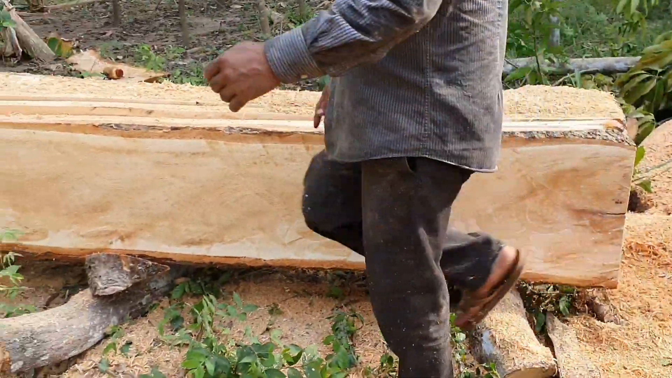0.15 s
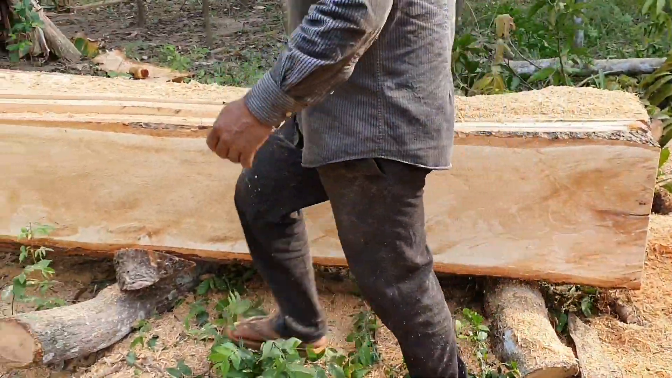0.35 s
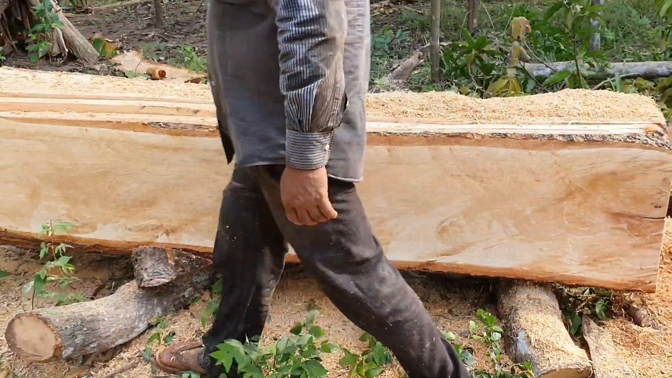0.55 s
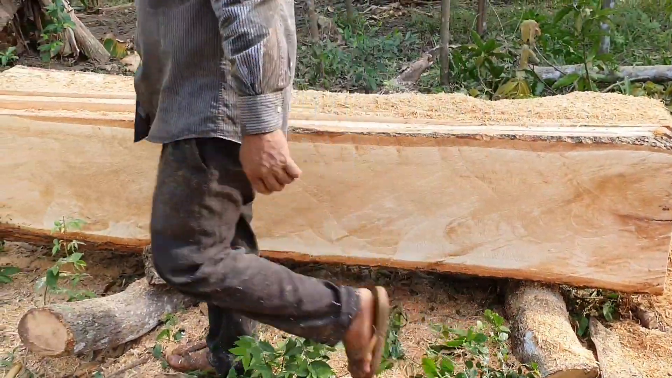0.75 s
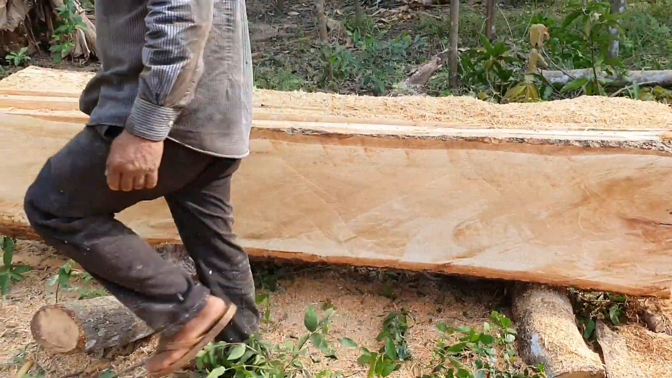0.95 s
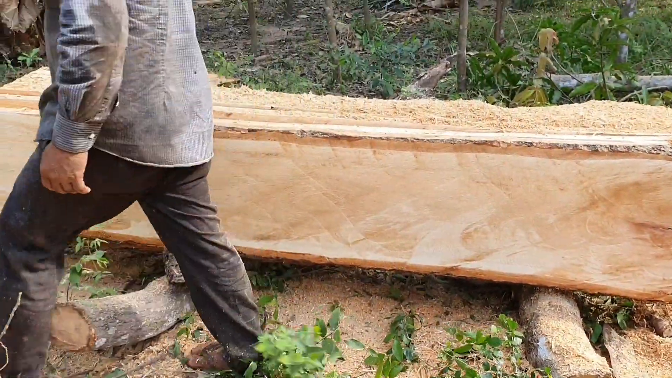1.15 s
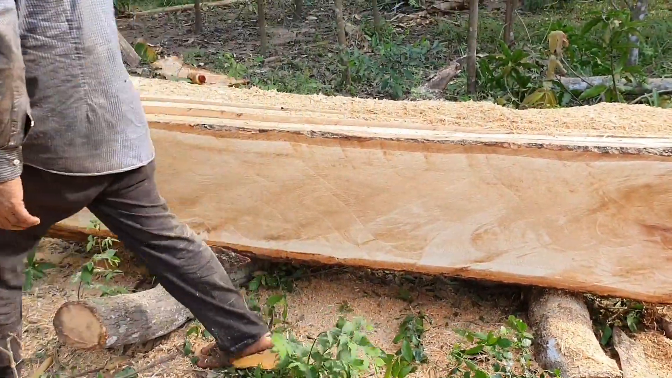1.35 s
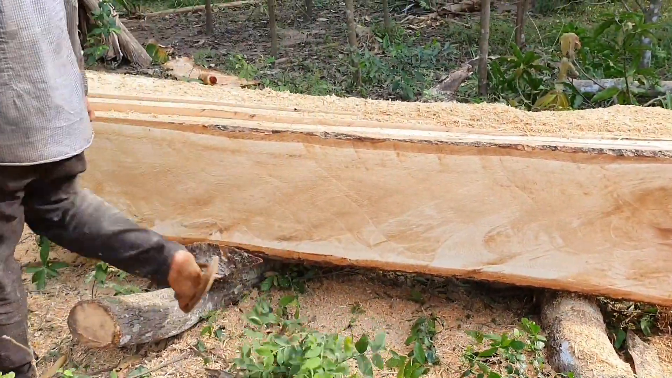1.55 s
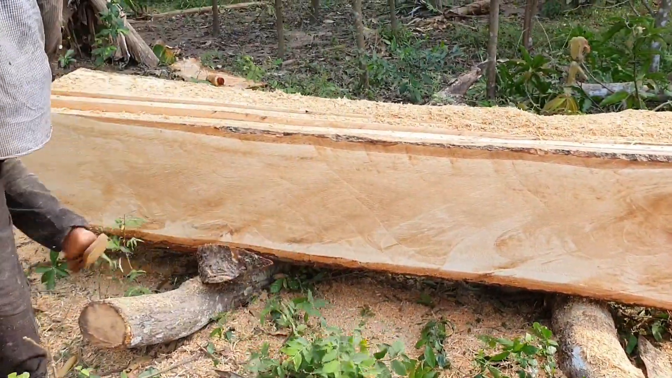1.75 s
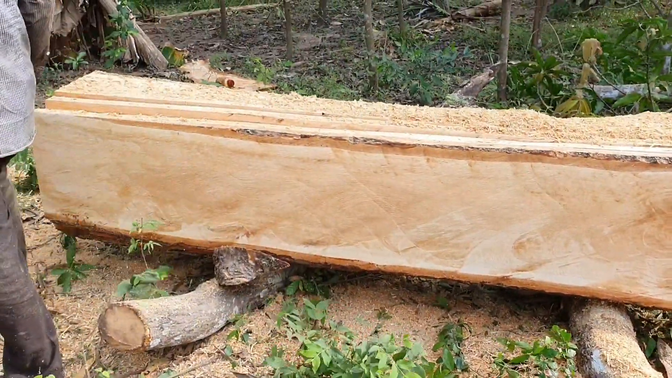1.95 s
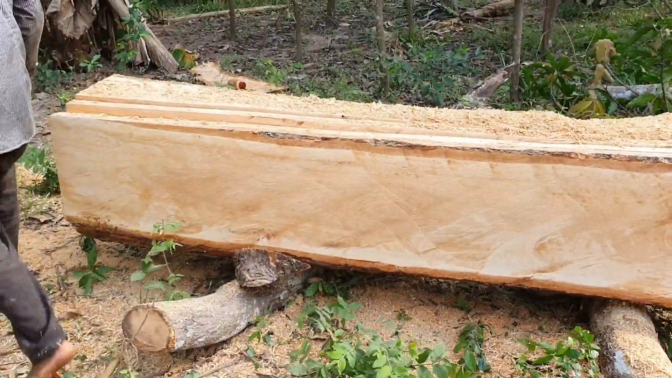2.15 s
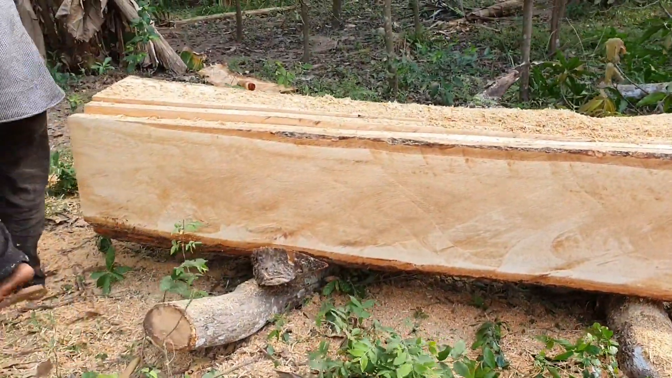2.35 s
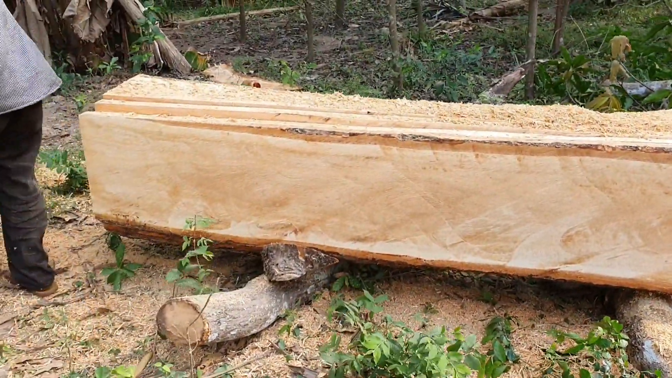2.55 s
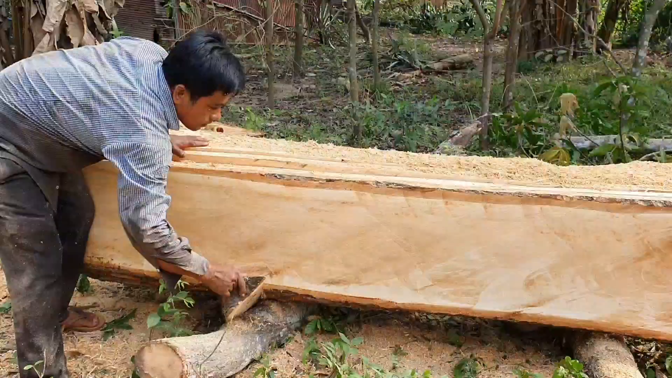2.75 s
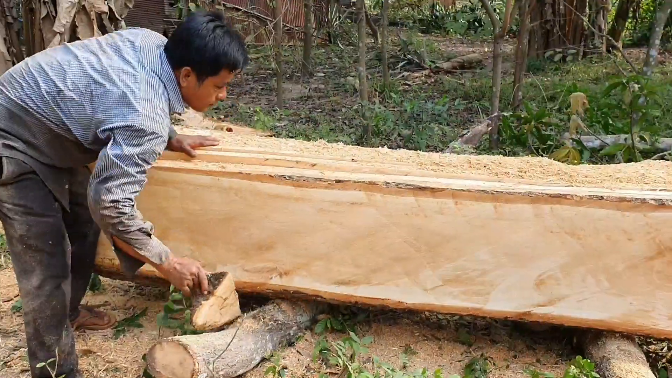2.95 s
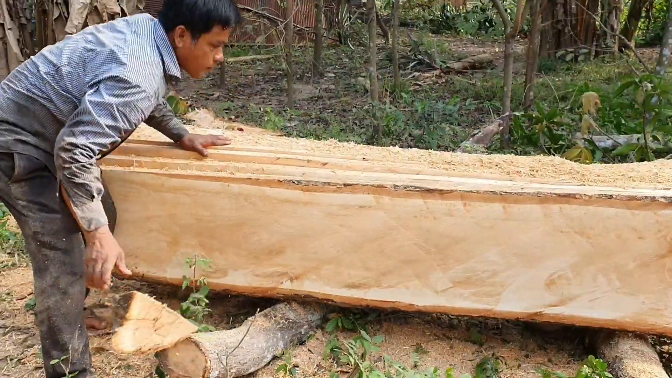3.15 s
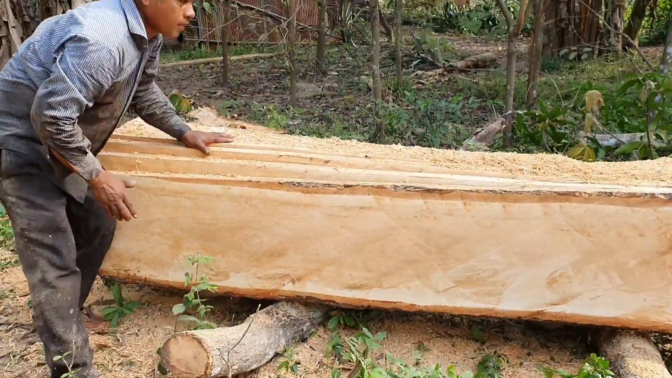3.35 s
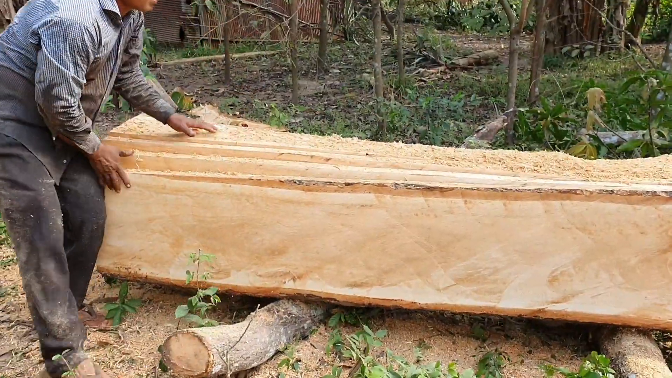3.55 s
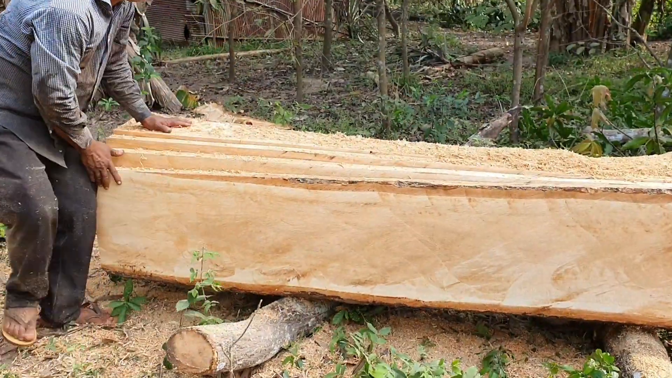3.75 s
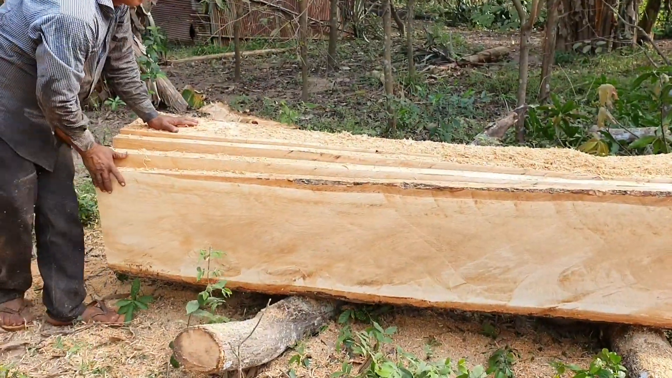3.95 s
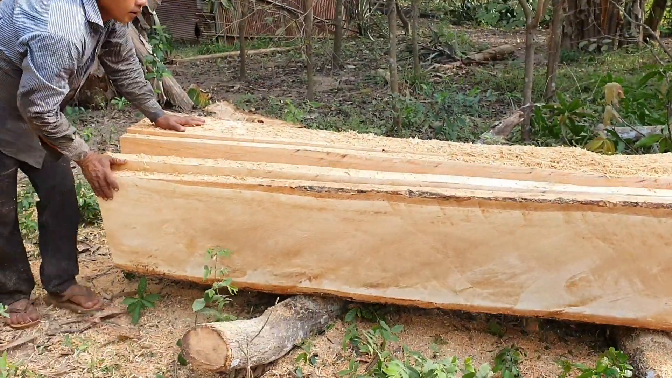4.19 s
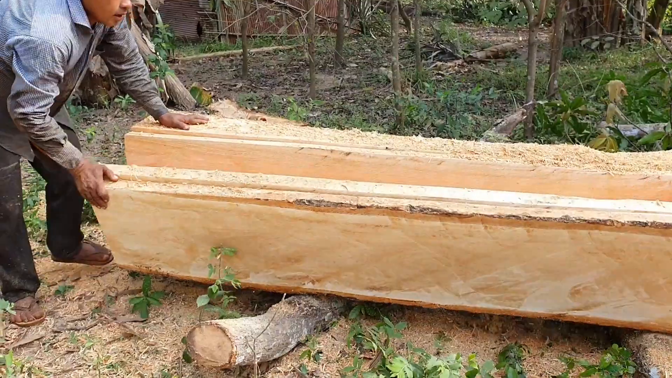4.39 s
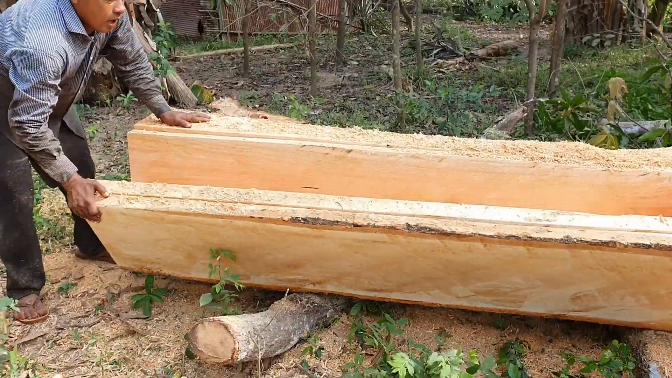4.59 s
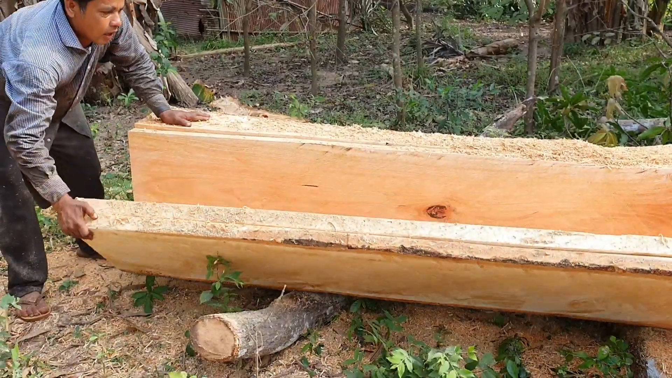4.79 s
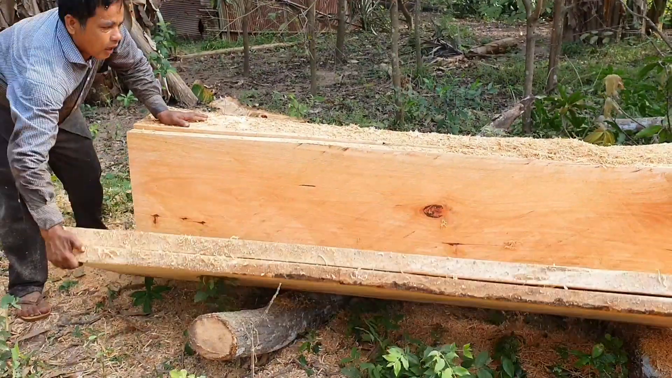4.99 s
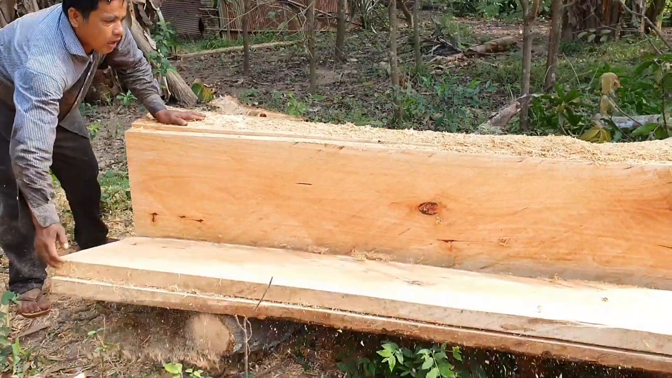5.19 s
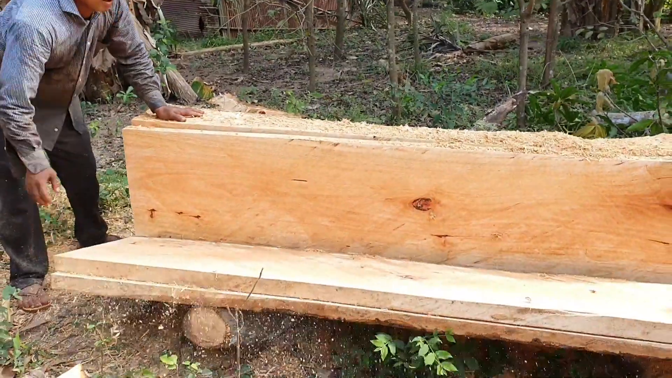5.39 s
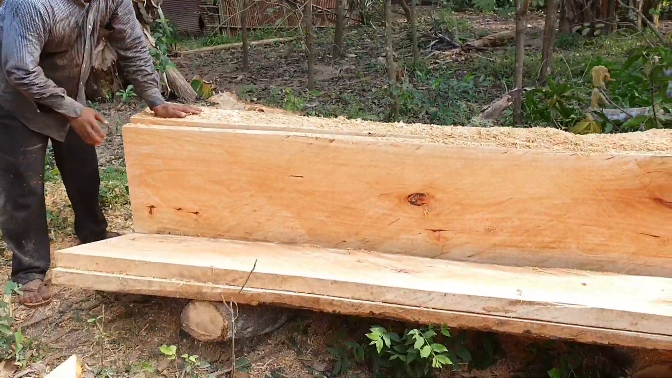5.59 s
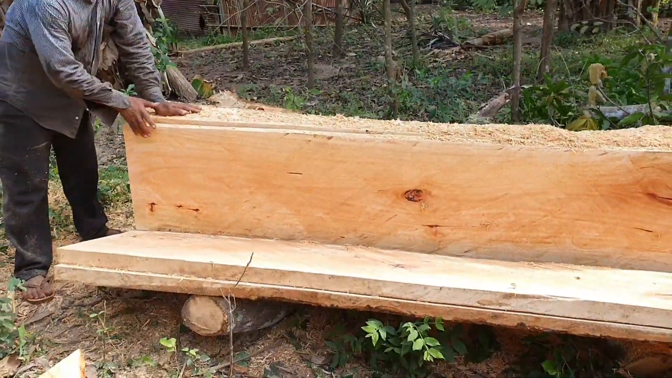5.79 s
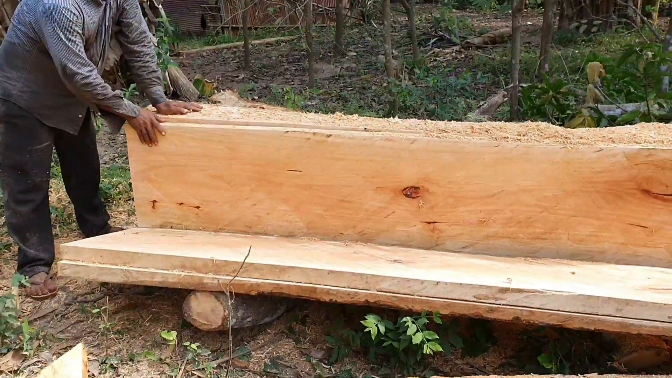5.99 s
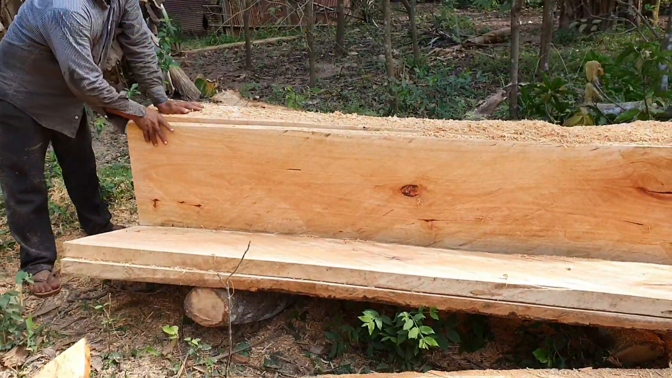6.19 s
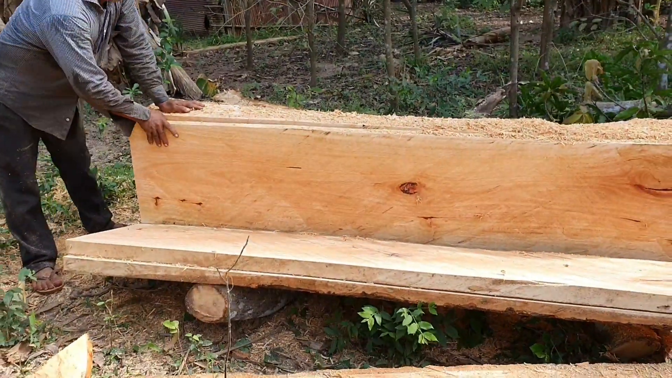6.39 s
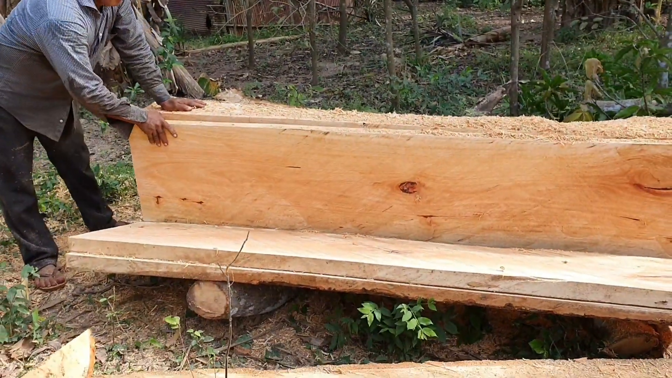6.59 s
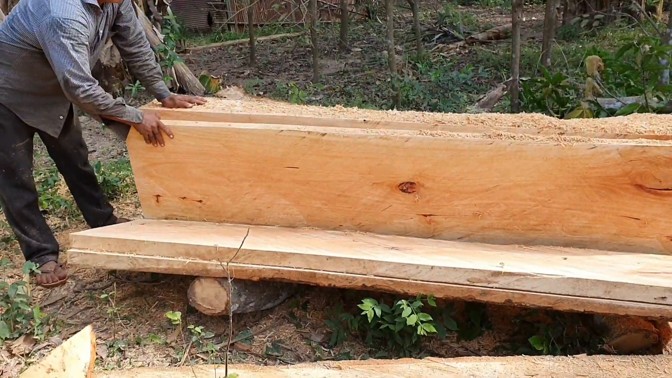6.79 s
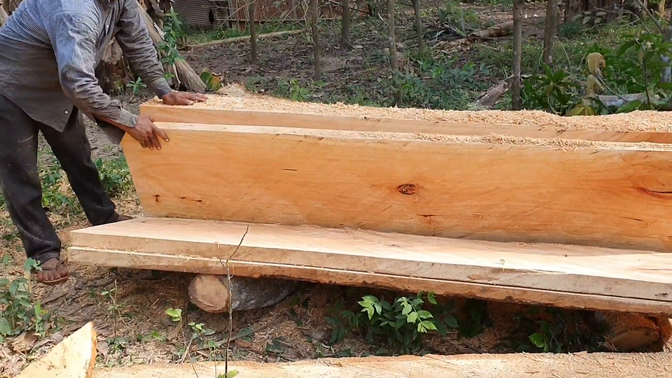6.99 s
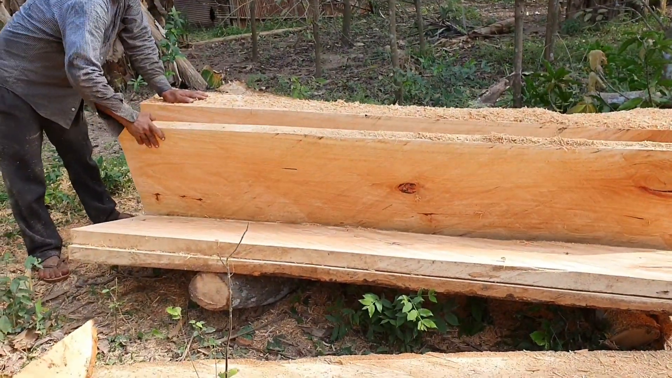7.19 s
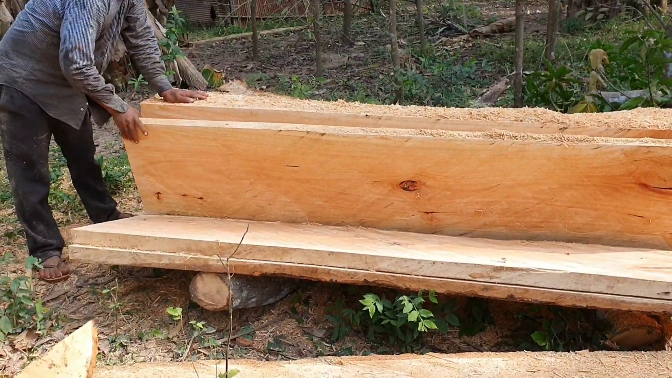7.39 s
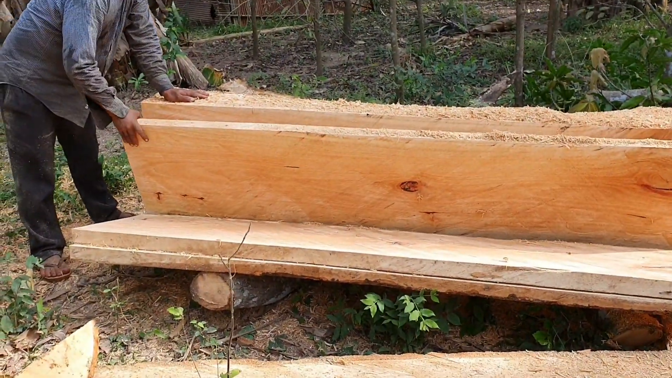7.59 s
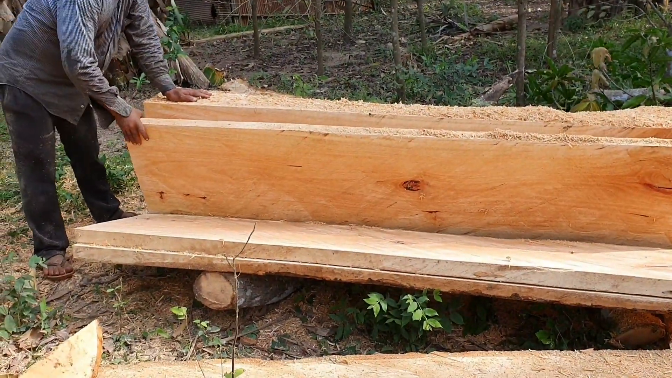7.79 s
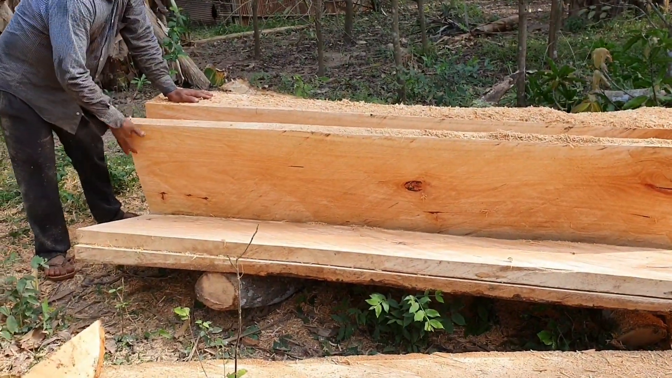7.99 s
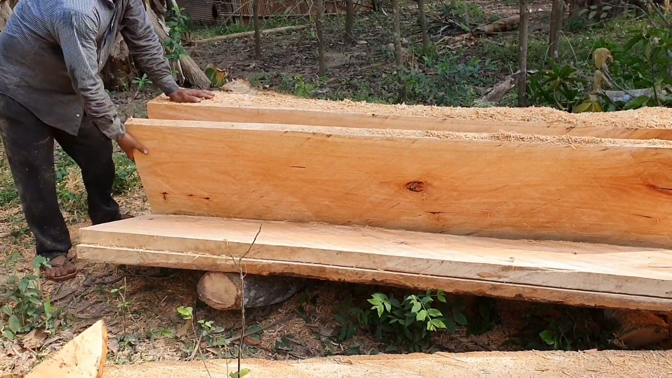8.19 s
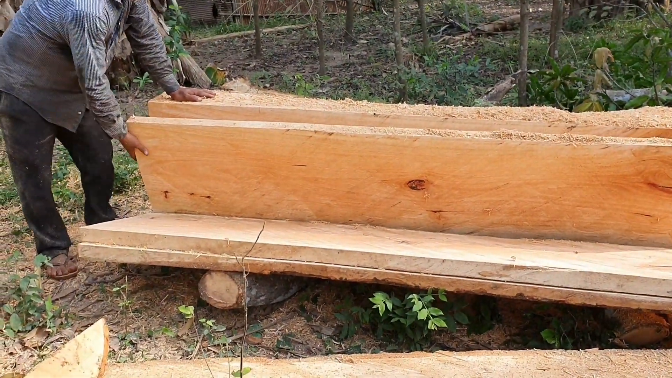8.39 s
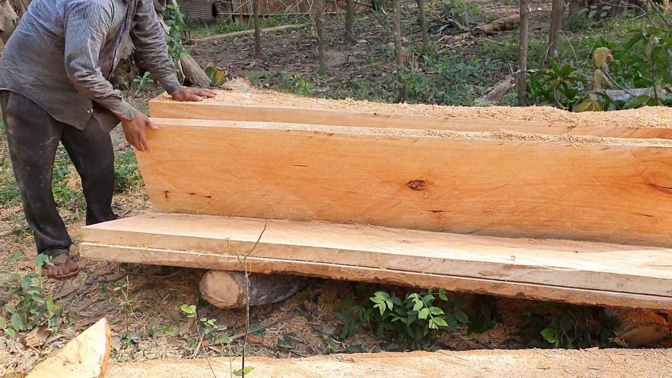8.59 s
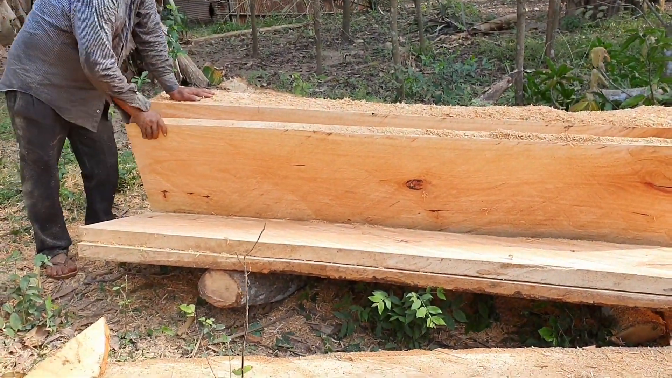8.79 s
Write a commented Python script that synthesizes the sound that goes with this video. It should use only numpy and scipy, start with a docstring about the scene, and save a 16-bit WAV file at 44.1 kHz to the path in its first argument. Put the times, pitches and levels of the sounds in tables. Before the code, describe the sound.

Footsteps snap twigs, a tossed wedge clacks, and thick boards tip with one loud woody slam; chicks, sparrows and a distant cock call.

```python
"""Tipping thick boards outdoors

Thick fresh boards are tipped over: a wedge is tossed aside, two boards slam onto a log, bounce and rattle.
Struck wood is resonant modes driven by short rough pushes; twigs are damped bursts, creaks gliding tones.
Leaf litter, sleeves and scrapes are swelling noise; chicks, sparrows, hens and a far cock are gliding tones.
Trees hiss and insects sing as steady noise. The left port is weaker than the right and leads it in phase."""
import sys
import numpy as np
from scipy import signal
from scipy.fft import rfft, irfft, next_fast_len
from scipy.io import wavfile
from scipy.ndimage import uniform_filter1d

SR = 44100
rng = np.random.default_rng(int(sys.argv[2]) if len(sys.argv) > 2 else 0)


def wav_out(sig):
    """Save sig, one row per channel (or a flat mono array), as 16-bit PCM at SR to the path in sys.argv[1]."""
    wavfile.write(sys.argv[1], SR, np.round(np.clip(np.atleast_2d(sig).T, -1, 1) * 32767).astype(np.int16))


N = 389844

# resonances of a lying board: f/Hz, bandwidth/Hz, level/dB
BOARD_MODES = [(172, 45, -9), (251.4, 36, 1), (351, 46, -9), (385, 26, -9.5), (491, 60, -9), (618, 78, -7),
               (665.4, 13, -6.5), (807, 70, -1), (941, 21, -6.5), (1025, 78, -8.5), (1205, 45, -7),
               (1446, 68, -6), (1790, 90, -5), (2060, 60, -6), (2240, 48, -5), (2680, 80, 1)]
# resonances of the edge on which the boards tip: f/Hz, bandwidth/Hz, level/dB
EDGE_MODES = [(1120, 70, 0), (1540, 90, -6), (1830, 90, -7), (2200, 120, -9), (2600, 110, -4),
              (3250, 140, -5)]


def amp(db):
    """Amplitude ratio of a level: 20 dB is a factor of ten."""
    return 10 ** (np.asarray(db) / 20)


def unit(x):
    """Normalisation to an rms value of 1."""
    return x / np.sqrt(np.mean(x ** 2) + 1e-20)


def peaked(x):
    """Normalisation to a peak value of 1."""
    return x / np.max(np.abs(x))


def along(points, hz):
    """Interpolation of (f/Hz, value) points on a logarithmic frequency axis."""
    f, v = np.transpose(points)
    return np.interp(np.log(hz + 1), np.log(f + 1), v)


def filtered(x, response):
    """Linear filtering: the spectrum is multiplied by a complex frequency response."""
    m = next_fast_len(N + SR // 2)
    return irfft(rfft(x, m) * response(np.fft.rfftfreq(m, 1 / SR)), m)[..., :N]


def band(hz, lo_hz, hi_hz):
    """Causal band-pass response with two poles at each edge."""
    high_pass = 1j * hz / (lo_hz + 1j * hz)
    low_pass = hi_hz / (hi_hz + 1j * hz)
    return (high_pass * low_pass) ** 2


def wood(modes, hz):
    """Modal superposition: damped resonators of alternating sign add up to the response of a piece of wood."""
    response = 0
    for k, (center_hz, width_hz, db) in enumerate(modes):
        resonance = 1j * hz * width_hz / (center_hz * center_hz - hz * hz + 1j * hz * width_hz)
        response = response + (-1) ** k * amp(db) * resonance
    return response


def smoothed_noise(shape, first, second):
    """Slow random fluctuation of rms 1: white noise averaged over two windows, in samples."""
    return unit(uniform_filter1d(uniform_filter1d(rng.standard_normal(shape), size=first), size=second))


def texture(spectrum, grit_db, patchy_db, flutter_db):
    """Granular noise: two rows with sparse random spikes, coloured, patchy and fluttering in time."""
    sizes = amp(grit_db * np.minimum(rng.exponential(size=N), 4))
    spikes = rng.standard_normal(N) * sizes * (rng.random(N) < .02)
    z = signal.stft(rng.standard_normal((2, N)) + spikes, nperseg=512)[2]
    # patches extend over frequency and time; the flutter moves all frequencies together
    patches = uniform_filter1d(uniform_filter1d(rng.standard_normal(z.shape[1:]), 6, 0), 6, 1)
    flutter = uniform_filter1d(rng.standard_normal(z.shape[2]), size=3)
    gain = amp(patchy_db * unit(patches) + flutter_db * unit(flutter))
    pair = signal.istft(z * gain, nperseg=512)[1][:, :N]
    return unit(filtered(pair, lambda hz: amp(along(spectrum, hz))))


def notes(rows, bend, rough_hz, second_db, hook_hz=0, lean=.8, flicker_db=0):
    """Frequency modulation: gliding tones with a second harmonic, roughened by a fast random warble.

    A small lean puts the loudest moment early; the hook lets the pitch slide up at the onset."""
    hook_s = .004  # time constant of the slide
    out = np.zeros(N + SR)
    for s, length, from_hz, to_hz, db in rows:
        u = np.arange(round(length * SR)) / (length * SR)
        warble, flicker = smoothed_noise((2, len(u)), 150, 100)
        glide_hz = from_hz + (to_hz - from_hz) * u ** bend - hook_hz * np.exp(-u * length / hook_s)
        phase = 2 * np.pi * np.cumsum(glide_hz + rough_hz * warble) / SR
        swell = np.sqrt(np.sin(np.pi * u ** lean)) * amp(flicker_db * flicker)
        tone = np.sin(phase) + amp(second_db) * np.sin(2 * phase)
        out[round(s * SR):][:len(u)] += amp(db + 5) * swell * tone
    return out[:N]


def swells(peak_s, fade_s, db, skirt_db, still_db):
    """Power summation: swells rise and fade evenly in dB, each on a wider skirt, over a still level."""
    rise_share = .7  # the rise takes this share of the fading time
    skirt_slower = 3.5  # the skirt lasts this many times longer
    t = np.arange(0, N, 64) / SR - peak_s[:, None]
    fall_db = 10 * abs(t) / (np.where(t < 0, rise_share, 1) * fade_s[:, None])
    shape = amp(-fall_db) ** 2 + amp(skirt_db - fall_db / skirt_slower) ** 2
    power = amp(db[:, None]) ** 2 * shape
    return np.repeat(np.sqrt(power.sum(0) + amp(still_db) ** 2), 64)[:N]


def boards():
    """Impact excitation: a short push with a rough surface rings the wood's modes and cracks in the treble."""
    # blows on wood: t/s, knock peak level/dB, boom level/dB re knock, crack level/dB re knock
    blows = [(3.091, -47.5, -30, 0), (3.297, -51, -28, 6.5), (3.308, -47, -34, 5.5), (3.3885, -29, -10, 3),
             (3.393, -34, -12, -3), (3.401, -40, -12, -14), (3.41, -52, 11, -9), (3.425, -58, 10, -9),
             (3.441, -43, -9, -4), (3.518, -48, 1, -6), (4.047, -47.5, -32, -2.5), (4.822, -42, -31, -3),
             (4.847, -40, -36, 1), (4.889, -30.5, -28, 0), (4.903, -43, -24, 4.5), (5.049, -42, -40, 5),
             (5.164, -27, -6, -13), (5.167, -19, -8, -18), (5.1705, -10, -14, -22), (5.185, -21, -12, -9),
             (5.189, -17, -7, -13), (5.2, -25, -8, 9.5), (5.218, -29, -2, -6), (5.262, -40, -20, -10),
             (5.2745, -34, -9, -8), (5.278, -19, -7, -28), (5.2815, -23, -5, -28), (5.291, -44, 9, -20),
             (5.34, -42, -24, -7), (5.349, -36, -5, -14), (5.381, -49.5, -14, 3), (6.975, -46, -29, 2.5)]
    # resonances of the wedge: f/Hz, bandwidth/Hz, level/dB
    wedge_modes = [(290, 78, -18), (405, 32, 3), (785, 54, -3), (937, 50, -2), (1430, 73, -11),
                   (1814, 110, -2), (2800, 300, -4), (5500, 900, -4)]
    wedge_gone_s, landing_s = 3.6, 5.15  # wedge blows end; until landing the boards stand on their edge
    lead_s = .004  # the surfaces grind this long before a blow
    pitch_scatter, level_scatter_db = .02, 3  # each blow lands elsewhere and excites the modes differently
    heavy_db, dulling = -28, .1  # knock's upper edge drops by this many dB per dB above heavy_db
    size = 8192
    out = np.zeros((2, N + SR))
    t, hz = np.arange(size) / SR - lead_s, np.fft.rfftfreq(size, 1 / SR)
    for s, db, boom_db, crack_db in [*blows, *rattle(count=16)]:
        is_wedge, standing = s < wedge_gone_s, wedge_gone_s < s < landing_s
        modes = np.array(wedge_modes if is_wedge else EDGE_MODES if s < landing_s else BOARD_MODES, float)
        modes[:, 0] *= np.exp(rng.normal(0, pitch_scatter, len(modes)))
        modes[:, 2] += rng.normal(0, level_scatter_db, len(modes))
        body = wood(modes, hz) + .2
        grind = amp(-60 * abs(t - .001) / np.where(t > .001, .016, .012))
        rough = rfft(rng.standard_normal((2, size)) * grind)
        # the impulse is in the first row only, the roughness differs between the rows
        impulse = [[1], [0]] * np.exp(-2j * np.pi * hz * (lead_s + .0015))
        push = impulse + .08 * rough
        knock_low_hz = 760 if standing else 520
        knock_top_hz = 2600 * amp(-dulling * max(db - heavy_db, 0))
        boom_low_hz = 300 if is_wedge else 125
        knock = peaked(irfft(push * body * band(hz, knock_low_hz, knock_top_hz) ** 2))
        boom = peaked(irfft(push * body * band(hz, boom_low_hz, 564) ** 3))
        crack = peaked(irfft(rough * band(hz, 3000, 4800) ** 3))
        blow = knock + amp(boom_db) * boom + amp(crack_db) * crack
        out[:, round((s - lead_s) * SR):][:, :size] += amp(db) * blow
    return out[:, :N]


def rattle(count):
    """Repeated contact: two landed boards rattle in small fading blows at uneven moments, as rows of blows."""
    slam_s, rattle_s = 5.168, .1
    u = (np.arange(count) + rng.random(count)) / count
    # knock starts near -26 dB and fades by 16 dB; boom -12 dB and crack -6 dB re knock
    return [(slam_s + rattle_s * a, -26 - 16 * a + rng.normal(0, 2), -12, -6) for a in u]


def creaks():
    """Stick-slip friction: the edge groans with a stuttering level, and uneven single slips ring its modes."""
    # groans on the log: t/s, duration/s, start f/Hz, end f/Hz, level/dB before the stutter
    groan_rows = [(4.7, .2, 1125, 1095, -62.5), (4.725, 0.048, 2620, 2570, -53),
                  (4.725, .045, 3280, 3220, -60), (4.82, .018, 1130, 1120, -51),
                  (4.842, .02, 1570, 1524, -52), (5.045, .045, 1160, 1170, -53),
                  (5.33, .018, 1680, 1640, -48), (5.354, .016, 1640, 1600, -52)]
    # judders on the log: peak t/s, time to fade 10 dB/s, level/dB
    judder_rows = [(4.735, .04, -55), (4.81, .04, -55), (4.85, .02, -52), (4.975, .03, -58),
                   (5.025, .04, -54), (5.075, .04, -53), (5.125, .05, -52)]
    slip_db, slips_per_s = 5, 380  # dB per unit of stutter; mean slip rate
    stutter = smoothed_noise(N, 350, 250)
    stutter_gain = amp(slip_db * (np.clip(stutter, -2, 1) - 1))
    groan = stutter_gain * notes(groan_rows, bend=1, rough_hz=45, second_db=-12)
    slips = rng.standard_normal(N) * (rng.random(N) < slips_per_s / SR)
    judder = unit(filtered(slips, lambda hz: wood(EDGE_MODES, hz)))
    return groan + swells(*np.transpose(judder_rows), skirt_db=-20, still_db=-110) * judder


def snaps():
    """Brittle fracture: a twig gives a sharp edge, a few damped cycles at its pitch and a crumble after it."""
    # twigs and grit underfoot: t/s, peak level/dB, f/Hz, edge level/dB re peak
    snap_rows = [(1.0846, -30.5, 2850, -34), (1.0995, -30.5, 2820, -18.5), (1.1395, -42, 2850, -13),
                 (1.1732, -29, 2210, -27.5), (1.2044, -35.5, 2870, -13.5), (1.2514, -39.5, 4880, -10),
                 (1.4082, -43, 3690, -17), (1.8897, -28.5, 2980, -16), (1.9083, -34.5, 3260, -9.5),
                 (1.956, -35, 2870, -32), (2.2954, -32, 3140, -21), (2.372, -35.5, 4790, -30.5),
                 (2.5262, -35, 2880, -33), (2.622, -24.5, 2450, -34.5), (2.6355, -39, 2470, -22.5),
                 (2.6489, -38.5, 2400, -4), (2.8015, -42, 5000, -22), (2.8625, -42, 3500, -16),
                 (3.479, -43, 2400, -30), (3.524, -41, 5700, -25), (3.729, -38, 4300, -25),
                 (4.692, -43, 3300, -28), (4.078, -42, 4150, -30), (5.415, -42, 5600, -25),
                 (5.469, -43, 5900, -22), (4.069, -36.5, 4060, -26), (4.4971, -37, 4030, -22),
                 (5.5254, -26, 5280, -21), (5.9274, -27, 3730, -24.5), (6.0449, -33, 3380, -23.5),
                 (6.133, -38, 4470, -23.5), (7.4315, -37, 3780, -26), (7.4966, -34.5, 2690, -19),
                 (8.0873, -40, 4200, -20.5), (8.6035, -41, 2445, -28), (8.669, -41, 2430, -25)]
    size = 2048
    out = np.zeros((2, N + SR))
    t, hz = np.arange(size) / SR, np.fft.rfftfreq(size, 1 / SR)
    decay = amp(-60 * t / .009) + .09 * amp(-60 * t / .063)  # break, then crumble
    onset = 1 - np.exp(-t / .002)
    for s, db, pitch_hz, edge_db in [*snap_rows, *grit(count=14)]:
        burst = rfft(rng.standard_normal((2, size)) * decay * onset)
        width_hz = pitch_hz / 5
        ring = 1j * hz * width_hz / (pitch_hz ** 2 - hz ** 2 + 1j * hz * width_hz)
        click = peaked(irfft(burst * (ring + .2) * band(hz, 1300, 5100) ** 2))
        edge = peaked(irfft(burst * band(hz, 9530, 18000) ** 2))
        out[:, round(s * SR):][:, :size] += amp(db) * (click + amp(edge_db) * edge)
    return out[:, :N]


def grit(count):
    """Random point process: faint ticks scattered over the whole scene, as rows of snaps."""
    # about -47 dB and 3300 Hz, edge -20 dB re peak
    return [(N / SR * rng.random(), -47 + rng.normal(0, 2), 3300 * np.exp(rng.normal(0, .25)), -20)
            for _ in range(count)]


def scuffs():
    """Sliding friction: short scuffs in the sawdust are falling tones with a wide random pitch warble."""
    # t/s, duration/s, start f/Hz, end f/Hz, relative level/dB
    scuff_rows = [(3.575, .045, 3600, 3020, -51.5), (3.635, 0.027, 3210, 2610, -54),
                  (3.715, .028, 4620, 4050, -52)]
    return notes(scuff_rows, bend=1, rough_hz=500, second_db=-22)


def tap():
    """Broadband impulse: a sharp dry click close by is one spike with a short rattle around it."""
    # spectrum of the click: f/Hz, level/dB
    tap_spectrum = [(25, -5), (120, 4), (600, -1), (2400, 3), (6000, 5), (9000, 0), (16000, -19.5)]
    t = np.arange(N) / SR - 6.031
    chatter = .14 * rng.standard_normal((2, N)) * amp(-60 * np.abs(t) / np.where(t > 0, .016, .006))
    spike = [[-1], [0]] * (abs(t) <= .5 / SR)
    return amp(-15.5) * peaked(filtered(spike + chatter, lambda hz: amp(along(tap_spectrum, hz))))


def rustle():
    """Friction noise: leaves crush, cloth swishes and wood scrapes over wood, swelling with each movement."""
    # steps and arm movements: peak t/s, time to fade 10 dB/s, crush level/dB, swish level/dB
    stirs = [(0.0, .2, -62, -75), (0.29, .08, -58, -80), (0.42, .08, -58, -71), (0.53, .07, -57, -70),
             (0.93, .12, -55, -67.5), (1.1, .06, -57, -76), (1.2, .07, -50, -62), (1.26, .07, -51, -56),
             (1.51, .08, -48, -55), (1.895, .06, -45, -58), (2.16, .15, -59, -73), (2.39, .12, -56, -71),
             (2.64, .08, -50.5, -74), (2.86, .05, -59.5, -78), (3.12, .05, -61, -83), (3.19, .06, -60, -76),
             (3.3, .04, -58, -72), (3.4, .1, -60.5, -74), (3.6, .07, -50.5, -66), (3.73, .04, -55, -80),
             (3.93, .06, -59, -78), (4.07, .07, -55.5, -79.5), (4.19, .07, -55, -68),
             (4.6, .16, -55.5, -66), (4.78, .08, -53, -64), (4.89, .08, -51, -64), (5.03, .08, -50, -64.5),
             (5.195, .035, -39, -54), (5.43, .12, -52.5, -74), (5.53, .06, -55.5, -64),
             (5.94, .05, -56.5, -71), (6.05, .05, -49, -68), (6.64, .15, -62, -76), (6.78, .12, -59, -72),
             (7.05, .1, -60, -73), (7.22, .1, -57, -79), (7.43, .06, -58, -70), (7.51, .06, -53, -61),
             (7.78, .08, -60, -74.5), (8.11, .1, -61, -81), (8.42, .15, -61, -80), (8.78, .15, -59, -78)]
    # wood dragged over wood: peak t/s, time to fade 10 dB/s, level/dB
    scrape_rows = [(.4, .9, -74), (1.1, .05, -64), (1.9, .08, -70), (3.11, .05, -63), (3.3, .04, -61),
                   (3.39, .08, -65), (4.07, .04, -70), (4.76, .1, -61), (4.97, .1, -64), (5.16, .07, -53),
                   (5.3, .1, -58), (5.54, .05, -63), (7.06, .1, -69.5), (7.51, .1, -70), (8.1, .05, -74)]
    # spectra of crushed leaves and of cloth: f/Hz, level/dB per Hz
    crush_spectrum = [(530, -51), (900, -27.5), (1150, -5.5), (1400, -9), (2270, -5), (2470, 0), (3970, 4),
                      (6940, -1), (9000, -27), (11700, -51), (19800, -120)]
    swish_spectrum = [(7000, -32.5), (8000, -13.5), (9000, -13), (10500, 0.5), (12000, 3.5), (15000, 0.5),
                      (17000, -12)]
    s, fade, crush_db, swish_db = np.transpose(stirs)
    slips = texture([(20, 0), (16000, 0)], grit_db=6, patchy_db=3, flutter_db=3)
    scrape = unit(filtered(slips, lambda hz: (wood(BOARD_MODES, hz) + .3) * band(hz, 650, 1700) ** 2))
    crush = texture(crush_spectrum, grit_db=5, patchy_db=2.5, flutter_db=1.5)
    swish = texture(swish_spectrum, grit_db=3, patchy_db=1.5, flutter_db=3.2)
    crush_gain = swells(s, fade, crush_db, skirt_db=-9.5, still_db=-68)
    swish_gain = swells(s, fade, swish_db, skirt_db=-12.5, still_db=-85)
    scrape_gain = swells(*np.transpose(scrape_rows), skirt_db=-10, still_db=-78)
    return crush_gain * crush + swish_gain * swish + scrape_gain * scrape


def sparrows():
    """Rapid frequency sweeps: every chirp is the same few fluttering strokes after a high opening note."""
    # main stroke t/s, relative level/dB, opening note level/dB re main stroke
    chirps = [(.282, -47, -13), (2.423, -52, -5), (3.95, -53.5, -2), (5.424, -49, -1), (6.797, -52, -8),
              (8.084, -46, -11), (8.768, -52, -6)]
    # strokes of one chirp: t/s re main stroke, duration/s, start f/Hz, end f/Hz, level/dB re main stroke
    strokes = [(-.03, .05, 6500, 5700, -14), (-.028, .024, 4500, 4250, -5), (0, .045, 4550, 2900, 0),
               (.004, .04, 5000, 4500, -8), (.03, .04, 3600, 2800, -8)]
    # opening note: t/s re main stroke, duration/s, start f/Hz, end f/Hz
    pickup = (-.04, .016, 5600, 5500)
    rows = []
    for s, db, pickup_db in chirps:
        for late, length, from_hz, to_hz, rel_db in [(*pickup, pickup_db), *strokes]:
            rows.append((s + late, length, from_hz, to_hz, db + rel_db))
    return notes(rows, bend=1, rough_hz=210, second_db=-40, hook_hz=500, lean=.7, flicker_db=4)


def chicks():
    """Near-sinusoidal phonation: peeps hook up to their pitch, then hold or glide, loudest early."""
    # t/s, duration/s, start f/Hz, end f/Hz, relative level/dB
    peeps = [(1.02, .09, 5000, 4900, -60), (1.46, .03, 4820, 4800, -57), (2.06, .1, 4900, 4900, -66),
             (3.09, .05, 4800, 5000, -60), (3.54, .07, 4880, 3300, -57), (4.12, .05, 4770, 4800, -56),
             (4.55, .09, 4770, 2900, -54), (5.09, .06, 4880, 3300, -53.5), (5.59, .09, 4780, 4750, -62),
             (6.11, .09, 4940, 2900, -58.5), (6.712, .035, 4900, 4900, -51), (7.195, .065, 4950, 3100, -54),
             (7.948, .072, 5100, 3100, -53), (8.73, .06, 4950, 4850, -51)]
    return notes(peeps, bend=1.3, rough_hz=45, second_db=-36.5, hook_hz=600, lean=.3, flicker_db=3.5)


def hens():
    """Low harmonic phonation: soft single coos of hens and doves, with a clear second harmonic."""
    # t/s, duration/s, start f/Hz, end f/Hz, relative level/dB
    coos = [(1.38, 0.1, 883, 892, -70), (1.68, 0.041, 1222, 1252, -60), (1.69, 0.14, 630, 640, -69.5),
            (2.78, 0.071, 835, 828, -74), (4.3, 0.03, 566, 570, -77), (5.43, 0.058, 923, 962, -61),
            (5.56, 0.042, 604, 600, -77), (6.77, 0.11, 643, 632, -78.5), (7.24, 0.075, 738, 805, -70),
            (7.38, 0.04, 788, 836, -71.5)]
    return notes(coos, bend=.97, rough_hz=22, second_db=-9, flicker_db=2.5)


def cock():
    """Harmonic series: three partials on one hoarse, sinking pitch; over the distance each flickers alone."""
    # one row for each stretch of the crow; a syllable may take two, a strong start and a weaker rest:
    # t/s, duration/s, relative level/dB of partials 1, 2 and 3
    crow = [(3.2, .13, -73, -67, -55), (3.335, .07, -73, -61, -48), (3.38, .11, -75, -66, -56),
            (3.48, .15, -79, -61, -66), (3.63, .3, -75, -65, -65), (4.12, .4, -74, -65, -67)]
    start_hz, sag_hz_per_s = 855, 95
    out = np.zeros(N)
    for s, length, *levels in crow:
        t = np.arange(round(length * SR)) / SR
        chance = smoothed_noise((4, len(t)), 700, 400)
        pitch_hz = start_hz - sag_hz_per_s * (s + t - crow[0][0])
        phase = 2 * np.pi * np.cumsum(pitch_hz + 5 * chance[3]) / SR
        flicker = amp(2.5 * chance)
        voice = sum(amp(db) * flicker[k] * np.sin((k + 1) * phase) for k, db in enumerate(levels))
        out[round(s * SR):][:len(t)] += voice * np.sin(np.pi * t / length)
    return out


def trees():
    """Stationary noise: far leaves hiss over a broad spectrum; insects hold a narrow band."""
    # spectrum of the distant trees: f/Hz, level/dB per Hz
    air = [(12, -37), (20, -13.5), (63, -0.5), (193, -13), (357, -12.5), (542, -25.5), (1000, -27),
           (1290, -14.5), (1400, -7), (2600, 0), (3160, 0.5), (3840, -8), (6540, -14), (8650, -39.5),
           (16000, -21)]
    hiss = texture(air, grit_db=0, patchy_db=2.73, flutter_db=.5)
    insects = unit(filtered(rng.standard_normal((2, N)), lambda hz: 1 / (1 + ((hz - 4870) / 110) ** 4)))
    return amp(-65.5) * hiss + amp(-72) * insects


def yard(x):
    """Reverberation: trunks and ground scatter the sound, and each frequency decays at its own speed."""
    # reverberation time: f/Hz, t60/s
    t60 = [(150, 0.14), (1000, 0.21), (5000, 0.12), (12000, 0.094)]
    hz, t, z = signal.stft(rng.standard_normal((2, SR // 2)), SR, nperseg=256)
    tail = signal.istft(z * amp(-60 * t / along(t60, hz)[:, None]), SR, nperseg=256)[1]
    return signal.fftconvolve(x[None], tail / np.linalg.norm(tail[0]), axes=1)[:, :N]


def ports(pair, likeness):
    """Interchannel coherence: right hears the first row, left a phase-turned, weaker blend of both.

    Dividing by the expected size of their mean keeps the source level."""
    # left port re right: f/Hz, level/dB
    weak = [(60, -12.5), (130, -11.5), (290, -7), (640, -4), (1410, -8.5), (3100, -9.5), (6820, -7),
            (15000, -8)]
    # phase lead of the left port: f/Hz, angle/rad
    turn = [(30, 1.4), (130, 1.85), (300, 2.22), (650, 2.15), (1300, 2.2), (2900, 1.8), (6000, 1.9),
            (9000, 1.6)]

    def shares(hz):
        left = amp(along(weak, hz)) * np.exp(1j * along(turn, hz))
        alike = np.clip(along(likeness, hz), 0, 1)
        mean = np.sqrt(1 + abs(left) ** 2 + 2 * alike * left.real) / 2
        return np.array([left * alike, left * np.sqrt(1 - alike ** 2), hz * 0 + 1]) / mean

    shared, own, right = filtered(pair[[0, 1, 0]], shares)
    return np.array([shared + own, right])


def scene():
    """Direct-to-reverberant ratio: near hits are almost dry, the fowl wet."""
    # likeness of the two ports for near hits and for spread sound: f/Hz, coherence
    direct = [(60, .7), (130, 0.95), (900, 0.92), (2000, 0.95), (5000, 0.93), (12000, 0.58)]
    diffuse = [(60, 0.37), (300, 0.27), (900, .8), (2000, 0.42), (5000, 0.25), (12000, 0.28)]
    hits = boards() + creaks() + snaps() + scuffs() + tap()
    fowl = sparrows() + chicks() + hens() + cock()
    echo = yard(amp(-14) * hits[0] + amp(-5) * fowl)
    near = hits + amp(-6.5) * fowl
    return ports(near, direct) + ports(echo + rustle() + trees(), diffuse)


def record(dry):
    """Band limitation: the recorder keeps nothing from 15.9 kHz upwards."""
    return filtered(dry, lambda hz: hz < 15900)


dry = scene()
out = record(dry)
wav_out(out)
```